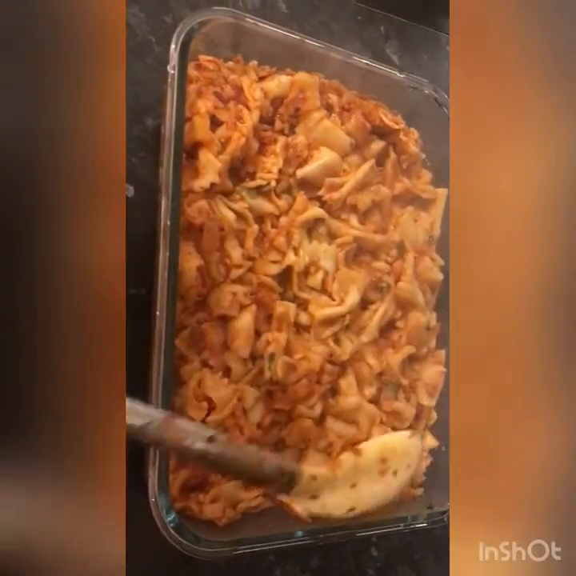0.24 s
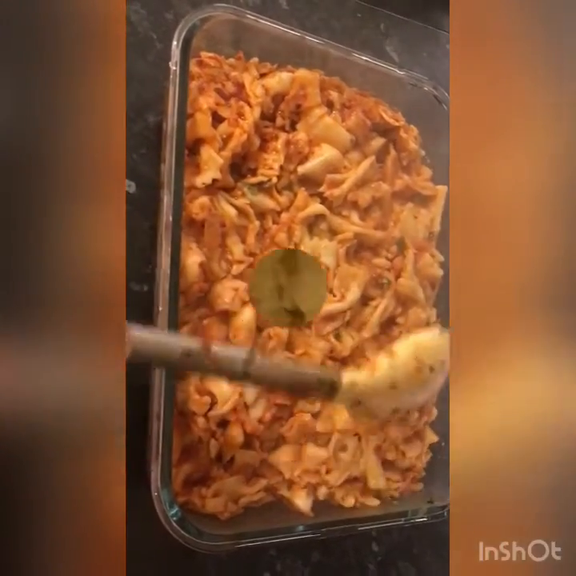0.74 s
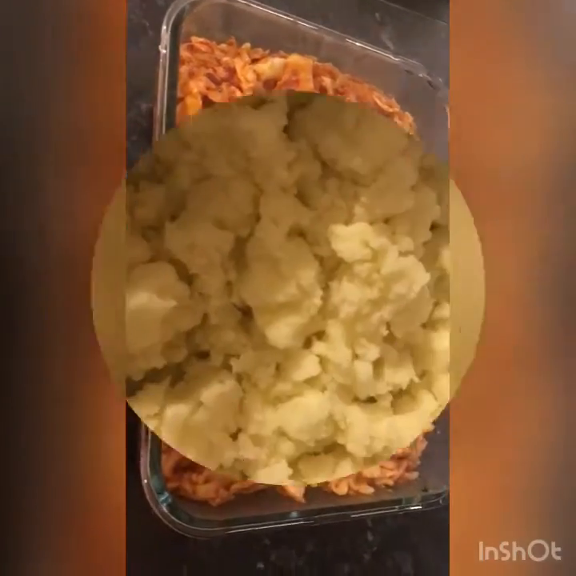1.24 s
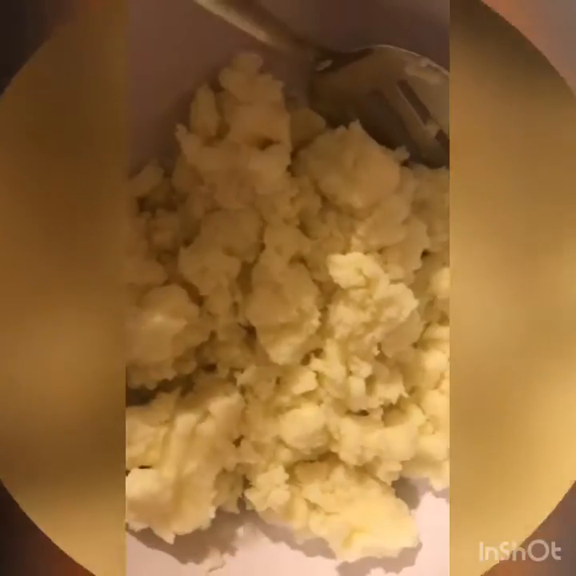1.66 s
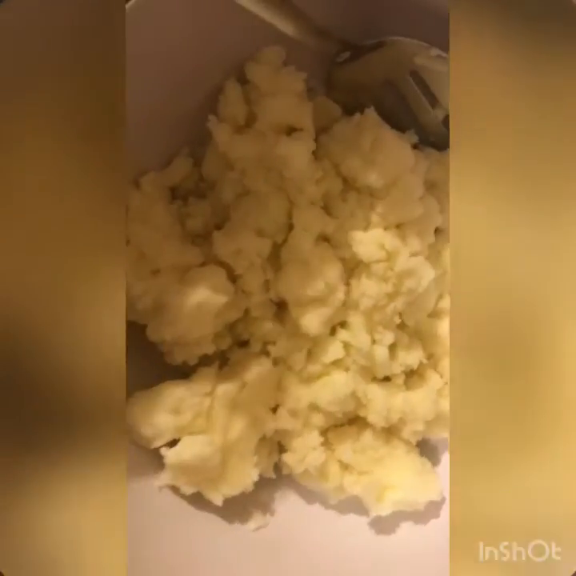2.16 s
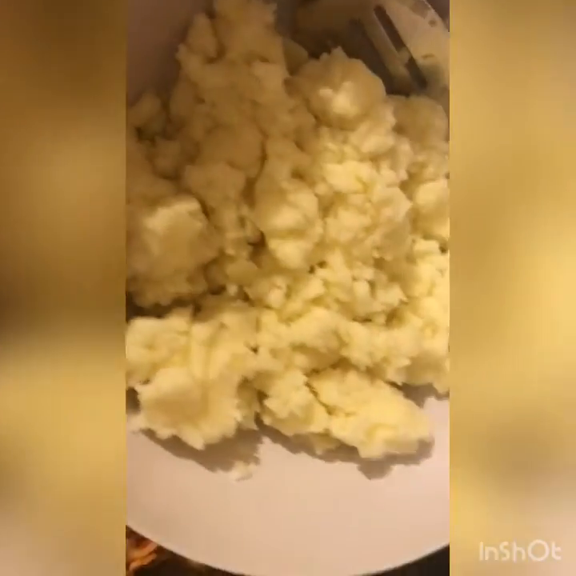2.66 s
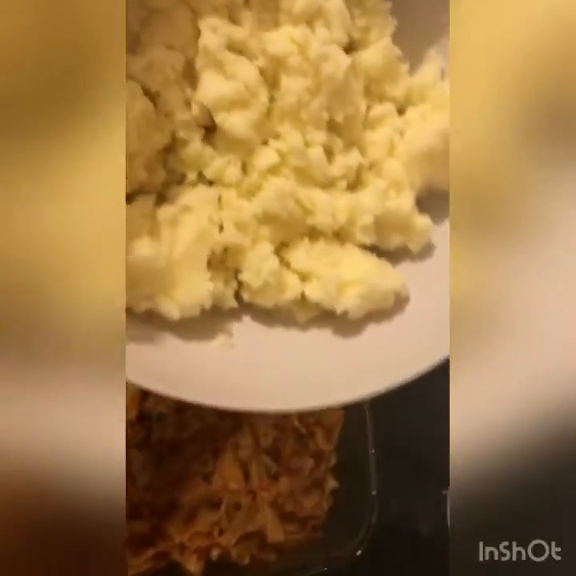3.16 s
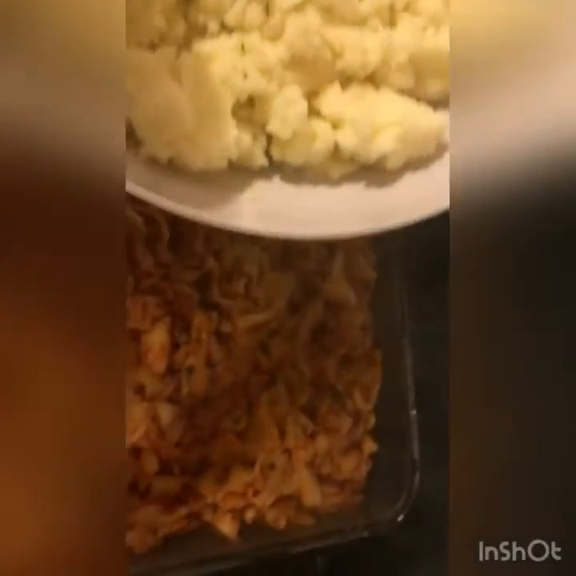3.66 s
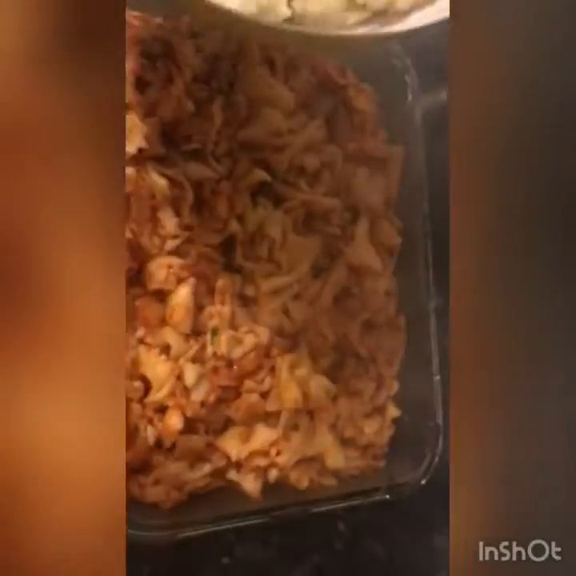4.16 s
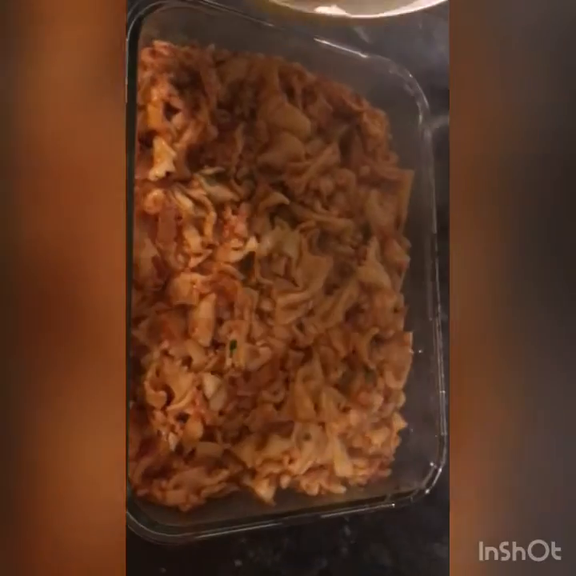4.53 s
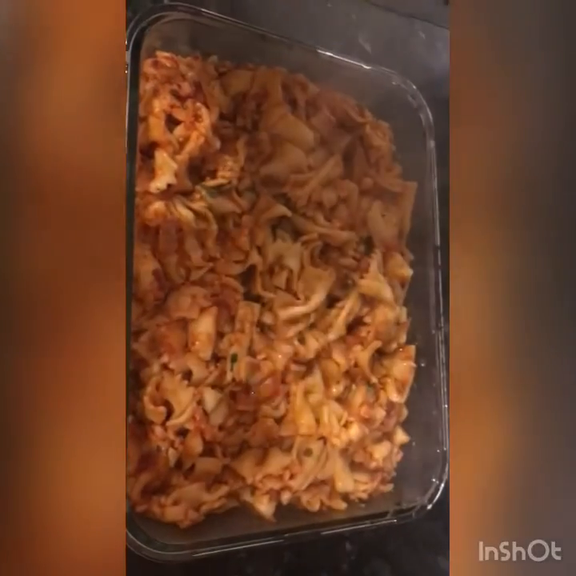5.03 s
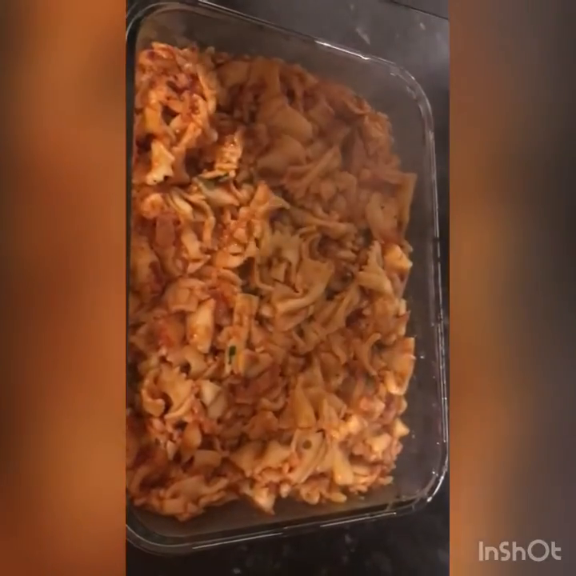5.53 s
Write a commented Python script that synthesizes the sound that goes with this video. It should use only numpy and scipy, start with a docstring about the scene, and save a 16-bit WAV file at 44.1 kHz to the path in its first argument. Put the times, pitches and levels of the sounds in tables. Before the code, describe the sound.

Wet pasta ticks softly, crockery knocks and scrapes on a stone worktop, cutlery slides and taps glass with one sharp overloaded clink, then near quiet.

```python
"""A kitchen counter, close by: a spoon smooths wet pasta with small sticky ticks, a ceramic bowl is knocked and
dragged over the stone, then cutlery slides and taps on a glass dish with one hard clink that overloads the input.
Ticks are band-passed noise bursts; bowl and dish are banks of decaying sines fed by impulses and lumpy friction
noise; taps and dry clicks are short noise cracks. A low room rumble and a soft rustle of shaped noise lie
under it all."""
import sys
import numpy as np
from scipy import signal
from scipy.fft import rfft, irfft, next_fast_len
from scipy.io import wavfile

SR = 44100
rng = np.random.default_rng(int(sys.argv[2]) if len(sys.argv) > 2 else 0)


def to_wav(sig):
    """Store sig (one row per channel, or 1-D mono) as 16-bit WAV at the path in sys.argv[1].

    Samples outside -1..1 are clipped; the rate is SR.
    """
    pcm = np.clip(np.atleast_2d(sig), -1, 1) * 32767
    pcm = np.round(pcm).astype(np.int16)
    wavfile.write(sys.argv[1], SR, pcm.T)  # frames by channels


N = 255118   # length in samples


def amp(db):
    """Gain of a level in dB."""
    return 10 ** (np.asarray(db) / 20)


def rms_one(x):
    """Scale to rms 1."""
    return x / np.sqrt(np.mean(x ** 2) + 1e-20)


def lowpass(x, hz):
    """Gentle first-order low-pass."""
    return signal.sosfilt(signal.butter(1, hz, fs=SR, output="sos"), x)


def bandpass(x, low_hz, high_hz, order=1):
    """Keep the band between two corner frequencies."""
    return signal.sosfilt(signal.butter(order, [low_hz, high_hz], "band", fs=SR, output="sos"), x)


def curve(rows):
    """Gain of the level column (silent outside the table) and the other columns, sample by sample."""
    t, rows = np.arange(N) / SR, np.array(rows)
    time_s = rows[:, 0]
    level_db, *others = [np.interp(t, time_s, column) for column in rows.T[1:]]
    inside = (t >= time_s[0]) & (t <= time_s[-1])
    return [amp(level_db) * inside] + others


def strokes(rows):
    """Summed gain of strokes that rise, hold and fall; other columns are averaged by each stroke's gain."""
    fade_db = 30.5   # drop over one rise or fall time; the slope in dB goes on beyond it
    t = np.arange(N) / SR
    gains, others = [], []
    for top_s, rise_s, hold_s, fall_s, level_db, *other in rows:
        before = (top_s - t) / rise_s
        after = (t - top_s - hold_s) / fall_s
        away = np.maximum(np.maximum(before, after), 0)
        gains.append(amp(level_db - fade_db * away) + 1e-12)
        others.append(other)
    gains = np.array(gains)
    gain = gains.sum(axis=0)
    return [gain] + list(np.array(others).T @ gains / gain)


def coloured(x, spectrum):
    """Shape a signal by a (pitch_hz, level_db) spectrum, then scale it to rms 1."""
    size = next_fast_len(N)
    hz, level_db = np.transpose(spectrum)
    bin_hz = np.arange(size // 2 + 1) * SR / size
    gain = amp(np.interp(np.log(bin_hz + 1), np.log(hz), level_db))
    return rms_one(irfft(rfft(x, size) * gain, size)[:N])


def tilt(x, bright_db, hz):
    """Raise or lower what lies above hz by a moving gain."""
    low = lowpass(x, hz)
    return low + amp(bright_db) * (x - low)


def ring(clicks, hz, t60_s):
    """A two-pole resonator: a unit click starts a decaying sine of height 1."""
    radius = amp(-60 / (t60_s * SR))
    angle = 2 * np.pi * hz / SR
    feedback = [1, -2 * radius * np.cos(angle), radius * radius]
    return signal.lfilter([0, np.sin(angle)], feedback, clicks + 1e-18)


def resonances(x, peaks):
    """Parallel (pitch_hz, width_hz, level_db) resonances, signs alternating; level_db sets the rms of each."""
    out = np.zeros(N)
    for k, (hz, width_hz, level_db) in enumerate(peaks):
        t60_s = np.log(1000) / np.pi / width_hz
        out += (-1) ** k * amp(level_db) * rms_one(ring(x, hz, t60_s))
    return out


def grains(spread_db, lump_hz):
    """Friction noise: dense contacts whose strength comes in lumps; rms 1."""
    lumps = rms_one(lowpass(rng.standard_normal(N), lump_hz))
    return rms_one(rng.standard_normal(N) * amp(spread_db * lumps))


def cracks(start_s, crack_db, from_hz, soft_hz, length_s):
    """Short chattering contacts: band-passed noise that builds up and lets go; a softer contact is duller."""
    out = np.zeros(N)
    phase = np.arange(1500) / SR / length_s
    envelope = np.exp(-phase) - np.exp(-4.0 * phase)
    for k, noise in enumerate(rng.standard_normal((len(start_s), 1500))):
        noise = lowpass(noise, 2 * soft_hz[k])
        contact = rms_one(bandpass(noise, from_hz[k], soft_hz[k]))
        at = int(start_s[k] * SR)
        out[at:at + 1500] += amp(crack_db[k]) * contact * envelope
    return out


def room():
    """Steady room noise: shaped noise plus a noisy hum of narrow resonances."""
    # spectrum of the room noise, relative: pitch_hz, level_db (per Hz)
    room_colour = [(25, -32.5), (45, -10), (65, 2), (105, 1.5), (150, -10.5), (250, -8.5), (420, -19),
                   (520, -22), (800, -25.5), (1500, -27), (3000, -43.5), (6000, -47), (10000, -48),
                   (16000, -40.5)]
    # noisy hum: pitch_hz, width_hz, level_db
    room_tones = [(194.1, 36, -56.5), (395, 40, -60.5)]
    noise = amp(-49.5) * coloured(rng.standard_normal(N), room_colour)
    return noise + resonances(rng.standard_normal(N), room_tones)


def rumble():
    """Rumble on the microphone: a low band of noise that wavers and follows a level curve."""
    # level of the rumble: time_s, level_db
    rumble_curve = [(0.0, -42), (0.08, -51.5), (1.33, -55), (2.14, -43.5), (2.17, -34), (2.24, -47),
                    (3.57, -50), (3.64, -40.5), (3.93, -58), (4.4, -44), (4.52, -49.5), (5.78, -45)]
    low_noise = bandpass(grains(spread_db=2, lump_hz=4), 58, 100, order=2)
    return curve(rumble_curve)[0] * rms_one(low_noise)


def rustle():
    """Rustle of hands and food: lumpy shaped noise with moving level and brightness."""
    # course of the rustle: time_s, level_db, brightness_db
    rustle_curve = [(0, -54.5, -21), (.5, -59, -5), (.74, -52, -9), (1.0, -59, 3.5), (1.3, -55, -5),
                    (1.6, -58.5, -11), (2.4, -59, -13.5), (3.1, -62.5, -0.5), (3.3, -50.5, -3),
                    (3.43, -49.5, 2), (3.6, -62.5, 6), (4.2, -62.5, -5.5), (4.53, -55.5, -1.5),
                    (4.7, -50, -2), (4.92, -56, 4), (5.05, -58, -3.5), (5.15, -55.5, 2), (5.33, -54.5, -7),
                    (5.6, -56.5, 2), (5.78, -49, -10)]
    # spectrum of the rustle, relative: pitch_hz, level_db (per Hz)
    rustle_colour = [(300, -6.5), (700, -5.5), (1500, -10), (3000, -7.5), (6000, -9), (9000, -11.5),
                     (12000, -14), (15500, -15)]
    gain, bright_db = curve(rustle_curve)
    noise = coloured(grains(spread_db=1.5, lump_hz=19.0), rustle_colour)
    return gain * tilt(noise, bright_db, hz=4000)


def swells():
    """Faint swells: noise through one resonance each, following a level curve."""
    # swells round one pitch: pitch_hz, width_hz, then a curve of time_s, level_db
    swell_rows = [(663.6, 10, [(0, -65), (1.4, -73), (1.6, -89)]), (1650, 270, [(0, -60), (.4, -70),
                  (.8, -72), (1.0, -74)]), (1180, 140, [(5.63, -65), (5.66, -53), (5.72, -53),
                  (5.78, -67)]), (251, 31, [(1.62, -44), (1.8, -55), (2.0, -48.5), (2.15, -53.5),
                  (2.3, -46.5), (2.42, -56)]), (304, 55, [(5.63, -54.5), (5.68, -48.5), (5.78, -61)])]
    out = np.zeros(N)
    for hz, width_hz, level_curve in swell_rows:
        out += curve(level_curve)[0] * resonances(rng.standard_normal(N), [(hz, width_hz, 0)])
    return out


def ticks():
    """Each film of sauce that breaks gives a snap and a tiny burst of noise round its own pitch."""
    # sticky ticks of wet food: start_s, level_db, centre_hz
    tick_rows = [(0.237, -41.5, 6840), (0.2577, -42, 8930), (0.274, -41.5, 7250), (0.2836, -39, 9000),
                 (0.3074, -48, 8970), (0.3144, -52, 8880), (0.3264, -41, 8780), (0.3473, -41.5, 9150),
                 (0.3706, -45, 4230), (0.3747, -44, 11800), (0.4, -32.5, 9600), (0.4614, -45, 4500),
                 (0.5054, -29, 4900), (0.621, -35.5, 5000), (0.6455, -42, 14000), (0.6932, -38, 7550),
                 (0.7073, -38, 7660), (0.9358, -41.5, 4490), (0.965, -29.5, 5860), (1.4234, -47, 6140)]
    t60_s, width_octaves = 0.015, 0.72
    out, t = np.zeros(N), np.arange(1500) / SR
    spread = 2 ** (width_octaves / 2)
    snap = 4.5 * (t == 0)
    noises = rng.standard_normal((len(tick_rows), 1500))
    for (start_s, level_db, hz), noise in zip(tick_rows, noises):
        burst = noise * amp(-60 * t / t60_s) + snap
        at = round(start_s * SR)
        out[at:at + 1500] += amp(level_db) * bandpass(burst, hz / spread, hz * spread, order=2)
    return out


def bowl():
    """Knocks and the drag over the stone feed the same modes; a glancing knock excites them as the drag does."""
    # shoves: loudest_from_s, rise_s, hold_s, fall_s, ring_db, grit_db (over ring), brightness_db,
    # grind_db (low grind over ring)
    shoves = [(1.625, 0.046, 0.053, 0.15, -58, -7, -1.5, 9.5),
              (1.746, 0.0034, 0.0086, 0.16, -44.5, -2, -20, 2.5),
              (1.84, 0.09, 0.047, 0.048, -48, -19, 6, 0), (1.95, 0.085, 0.087, 0.15, -37, -17.5, -1.5, -24),
              (2.12, 0.068, .05, 0.14, -52, -10, -6, -2.5),
              (2.244, 0.0037, 0.034, 0.13, -41.5, -2, -5.5, -10)]
    # knocks: start_s, level_db, glancing (0-1)
    knocks = [(1.7436, -23.5, 0.06), (1.752, -26.5, 0), (1.760, -26, 0.1), (1.799, -33, 0.14),
              (1.83, -44, 0.14), (1.899, -35, 0.19), (1.946, -33, 0.73), (2.2432, -36, 1),
              (2.266, -55, .95), (2.31, -42, 1)]
    # spectrum of the grit, relative: pitch_hz, level_db (per Hz)
    grit_colour = [(300, -4), (1000, 1), (2000, -12), (4000, -5), (6500, -1), (8000, -15), (16000, -34)]
    # pitches of the bowl's modes: pitch_hz
    bowl_hz = [215, 603, 899, 1184, 1419, 1443, 1760, 2121, 2200, 2585, 2665, 2700, 2807, 3450, 4215, 4306,
               4623, 5365, 5439, 5830, 6250, 6285, 6900, 7870, 8870, 9120, 9790, 11600, 12600, 13700]
    # the modes in the same order: struck_db, dragged_db, t60_s
    bowl_modes = [(-12, -11, 0.069), (-7.5, -46, 0.1), (-17, -36, 0.25), (-22, -25, 0.069),
                  (-27, -36, 0.05), (2, -21.5, 0.19), (-43, -25, 0.28), (-19, -39, 0.079), (-22, -24, 0.17),
                  (-33, -8.5, 0.069), (-11, -4.5, 0.095), (-17.5, -4.5, 0.095), (-12, -11, .12),
                  (-43, -20, 0.097), (-22, -8, 0.036), (-25, -27, 0.092), (-20, -9.5, 0.054),
                  (-30, -10, 0.038), (-30, -12, 0.093), (-35, -14, 0.11), (-30, -6.5, 0.048),
                  (-33, -19, 0.093), (-41, -15.5, 0.074), (-45, -20, 0.096), (-44, -25, 0.09),
                  (-49, -26, 0.13), (-52, -26.5, 0.14), (-47, -24.5, 0.08), (-46, -28, .08),
                  (-44, -34, .08)]
    gain, grit_db, bright_db, grind_db = strokes(shoves)
    start_s, knock_db, glancing = np.transpose(knocks)
    at = (start_s * SR).astype(int)
    out = gain * amp(grit_db) * coloured(grains(spread_db=3.0, lump_hz=60), grit_colour)
    grind = bandpass(grains(spread_db=0.8, lump_hz=60), 180, 900)
    out += gain * amp(grind_db) * rms_one(grind)   # the foot of the bowl shakes the counter
    for hz, (struck_db, dragged_db, t60_s) in zip(bowl_hz, bowl_modes):
        # brightness lifts modes above 2700 Hz and lowers those below
        octaves = np.log2(np.clip(hz, 1400, 8000) / 2700)
        # each mode is rubbed in lumps of its own
        force = gain * grains(spread_db=3.0, lump_hz=30) * amp(dragged_db + bright_db * octaves)
        force = force * np.sqrt(4 * np.log(1000) / (t60_s * SR))   # even rms whatever the decay
        mode_db = struck_db + glancing * (dragged_db - struck_db)
        force[at] += rng.choice([-1, 1]) * amp(knock_db + mode_db)
        out += ring(force, hz, t60_s)
    return out


def dry_clicks():
    """Dry clicks: cracks of noise that set nothing ringing."""
    # clicks: start_s, level_db (before the envelope), from_hz, softness_hz
    click_rows = [(1.6502, -31, 1100, 2300), (2.2425, -33, 2830, 8750), (4.5396, -26, 860, 3840),
                  (5.222, -27.5, 776, 5000), (5.398, -30, 882, 4000)]
    return cracks(*np.transpose(click_rows), length_s=0.003)


def dish_taps_and_slides():
    """Each tap is a short chattering crack plus the dish's modes; slides are friction through broad resonances."""
    # taps of cutlery, among them the hard clink and its bounces:
    # start_s, crack_db (before the envelope), crack_from_hz, contact_softness_hz, dish_ringing_db
    taps = [(2.883, -48, 2000, 3500, -68), (3.056, -37, 2500, 6000, -43.5), (3.143, -49, 1010, 4000, -61.5),
            (3.203, -26, 496, 5000, -39), (3.4085, 9, 714, 9660, -9), (3.415, -3, 2570, 6000, -18),
            (3.432, -9.5, 705, 6000, -17), (3.437, -14.5, 1000, 5000, -24),
            (3.441, -19.5, 1983, 5000, -23.5), (3.456, -26.5, 2000, 5000, -37),
            (3.466, -28, 1500, 5000, -39), (3.576, -48, 1000, 4000, -36.5), (4.024, -21.5, 1500, 6000, -34)]
    # cutlery sliding: loudest_from_s, rise_s, hold_s, fall_s, level_db, brightness_db, low_body_db
    slides = [(3.058, 0.029, 0.011, 0.037, -47.5, -1, -13), (3.141, 0.04, 0.011, 0.017, -45, -13, -6.5),
              (3.33, 0.22, 0.067, .01, -50.5, 6.5, -20), (3.572, .06, 0.018, 0.016, -45, 0.5, -7.5),
              (3.74, 0.026, 0.0062, 0.032, -54.5, -7, -6), (3.86, 0.2, 0.04, .01, -45.5, 6, -10),
              (4.036, 0.015, 0.036, 0.015, -40.5, 8, -33), (4.08, 0.0092, 0.024, 0.15, -56, -6.5, -16.5)]
    # broad resonances of the slide, relative: pitch_hz, width_hz, level_db
    slide_rings = [(1500, 41, -8), (2760, 150, 2), (3150, 140, 1.5), (3700, 170, 5), (4300, 710, 3),
                   (5670, 96, -5), (6000, 240, -0.5), (6780, 2100, -12), (8860, 170, -5.5),
                   (10800, 450, -15), (14500, 1200, -6)]
    # pitches of the dish's modes: pitch_hz
    dish_hz = [255, 392, 570, 743, 906, 1124, 1590, 2320, 2654, 2892, 2937, 3081, 3497, 3546, 3772, 3938,
               4195, 4850, 5590, 6540, 7274, 7570, 8010, 8450, 8790, 9570, 9870, 10305, 11200, 12600]
    # the modes in the same order: level_db, t60_s
    dish_modes = [(-12, 0.083), (-13.5, 0.12), (-12, 0.12), (-18, 0.18), (-12, 0.088), (-9, .06),
                  (-5, 0.071), (-17, .04), (-14, 0.11), (-12, .09), (-18.5, .09), (-14.5, 0.13), (-5, .1),
                  (-11, 0.1), (2.5, 0.05), (0.5, 0.096), (-13.5, 0.044), (-16, 0.021), (-9.5, 0.027),
                  (-19, .06), (-8, .07), (-15.5, 0.058), (-16.5, 0.087), (-17.5, 0.088), (-11, 0.077),
                  (-16.5, 0.082), (-16.5, .06), (-15, 0.11), (-11.5, 0.082), (-16.5, 0.029)]
    start_s, crack_db, from_hz, soft_hz, ringing_db = np.transpose(taps)
    at = (start_s * SR).astype(int)
    out = cracks(start_s, crack_db, from_hz, soft_hz, length_s=0.003)
    scatter_db = 3 * rng.standard_normal((len(at), len(dish_modes)))   # every tap rings the modes differently
    gain, bright_db, body_db = strokes(slides)
    rubbing = gain * grains(spread_db=2.5, lump_hz=120)
    for hz, (level_db, t60_s), own_db in zip(dish_hz, dish_modes, scatter_db.T):
        force = rubbing * amp(level_db - 36)   # the slide also feeds the modes
        softening = np.hypot(1, hz / soft_hz)   # a soft contact excites high modes less
        force[at] += rng.choice([-1, 1]) * amp(ringing_db + level_db + own_db) / softening
        out += ring(force, hz, t60_s)
    hiss = lowpass(grains(spread_db=3.0, lump_hz=119.6), 9000)
    resonant = resonances(grains(spread_db=2.7, lump_hz=120), slide_rings)
    slide = rms_one(resonant + amp(10.5) * hiss)
    body = rms_one(bandpass(grains(spread_db=3.0, lump_hz=120), 600, 2500))
    return out + gain * (tilt(slide, bright_db, hz=5000) + amp(body_db) * body)


def kitchen(x):
    """Reflections: dying noise from 3 ms on, the treble dying faster."""
    t60_s = 0.25
    t = np.arange(SR // 2) / SR
    noise = rng.standard_normal(len(t))
    low = lowpass(noise, 4000)
    treble = (noise - low) * amp(-150 * t)
    tail = (low + treble) * amp(-60 * t / t60_s) * (t > .003)
    return signal.fftconvolve(x, tail / np.linalg.norm(tail))[:N]


def scene():
    """The near sources sound in the kitchen, over the background."""
    background = room() + rumble() + rustle() + swells()
    near = ticks() + bowl() + dry_clicks() + dish_taps_and_slides()
    return (near + amp(-12) * kitchen(near) + background)[None]


def record(dry):
    """The microphone has a dip in the treble; deep bass is cut, the input clips, then the top is cut."""
    # dip of the microphone: centre_hz, width_hz, depth (0-1)
    mic_dip = (10500, 600, 0.45)
    hz, width_hz, depth = mic_dip
    x = dry - depth * signal.lfilter(*signal.iirpeak(hz, hz / width_hz, fs=SR), dry)
    x = signal.sosfilt(signal.butter(3, 45, "high", fs=SR, output="sos"), x)
    clipped = np.clip(x, -1, 1)
    top_cut = signal.cheby2(16, 50, 16300, fs=SR, output="sos")   # 50 dB down from 16300 Hz up
    return signal.sosfilt(top_cut, clipped)


dry = scene()
out = record(dry)
to_wav(out)
```